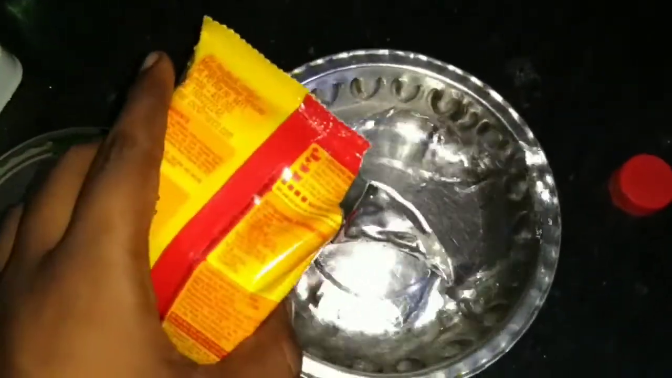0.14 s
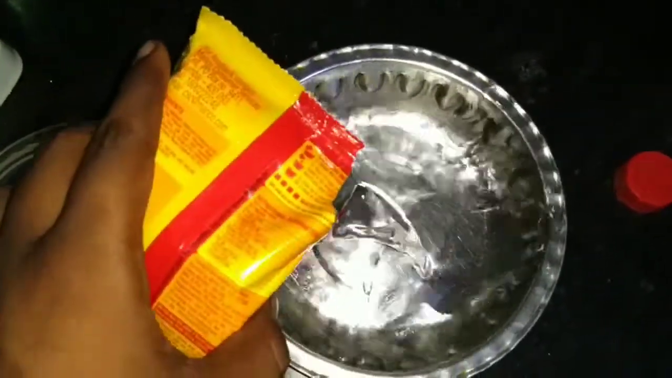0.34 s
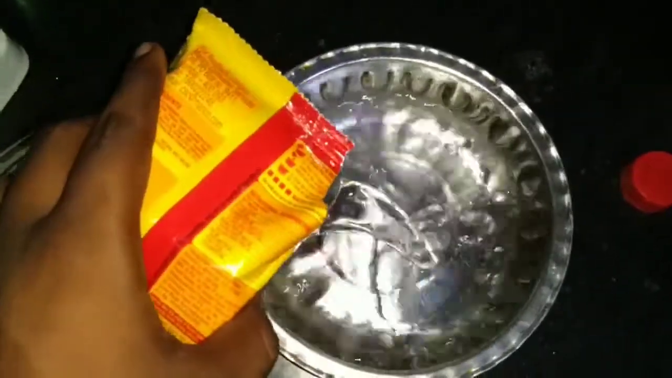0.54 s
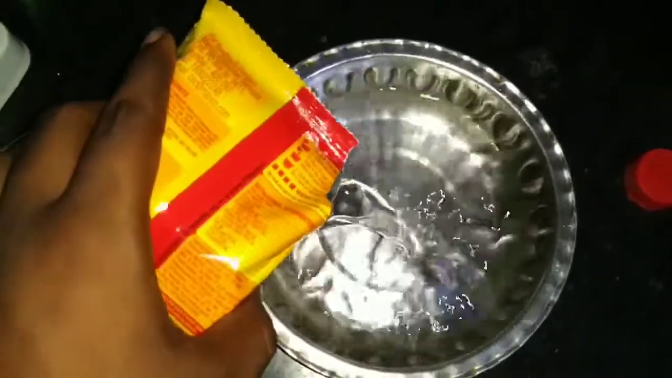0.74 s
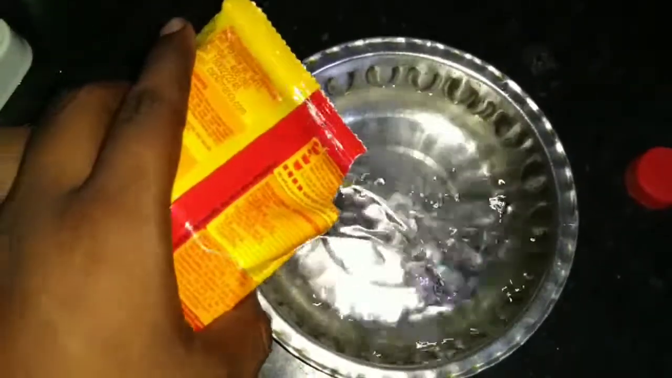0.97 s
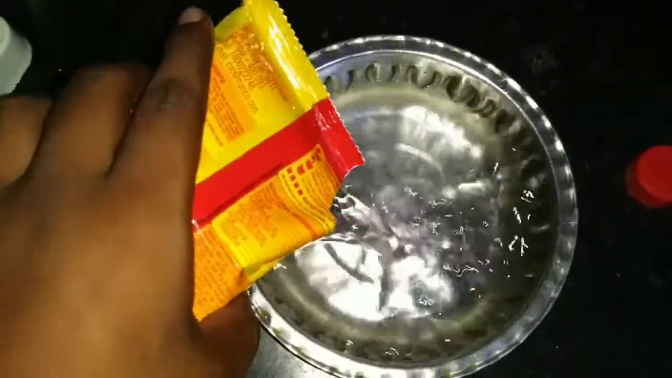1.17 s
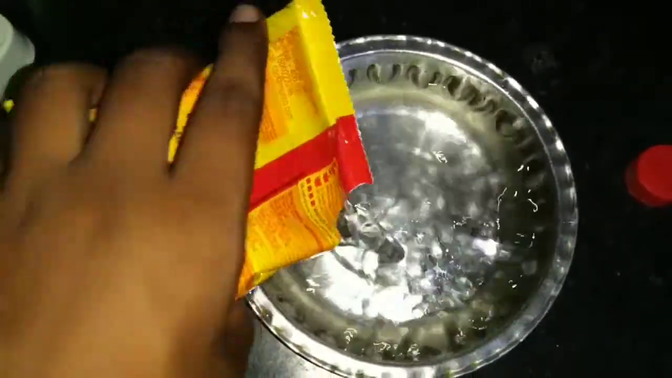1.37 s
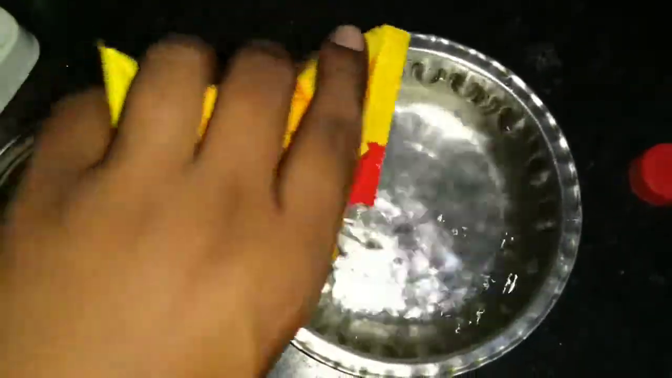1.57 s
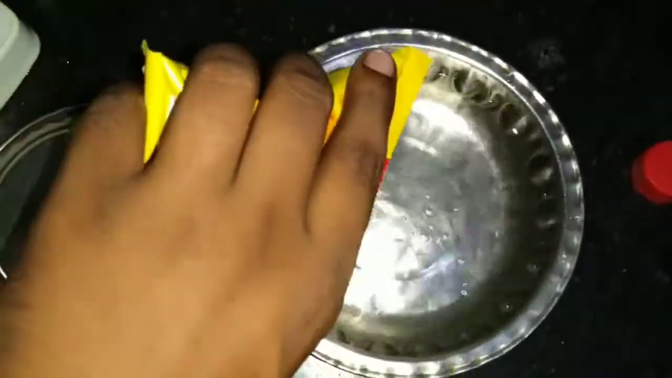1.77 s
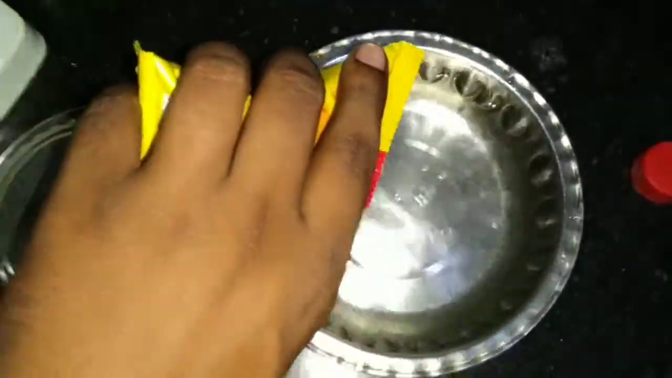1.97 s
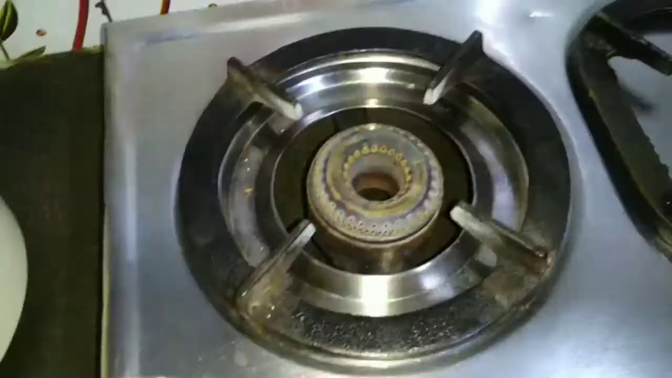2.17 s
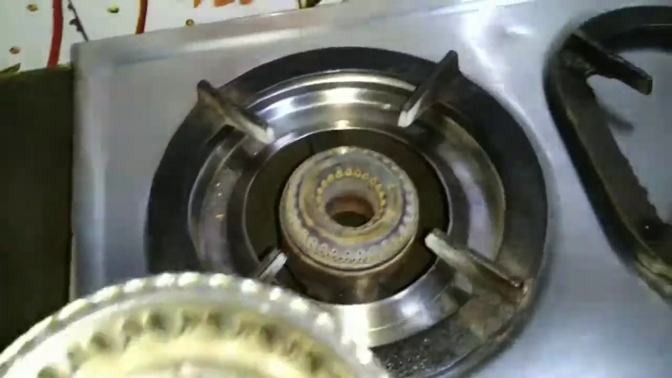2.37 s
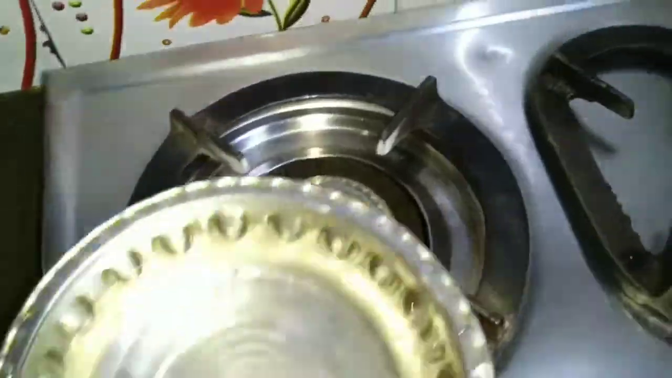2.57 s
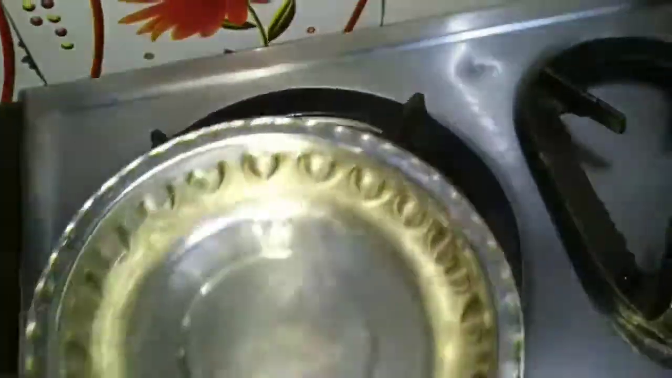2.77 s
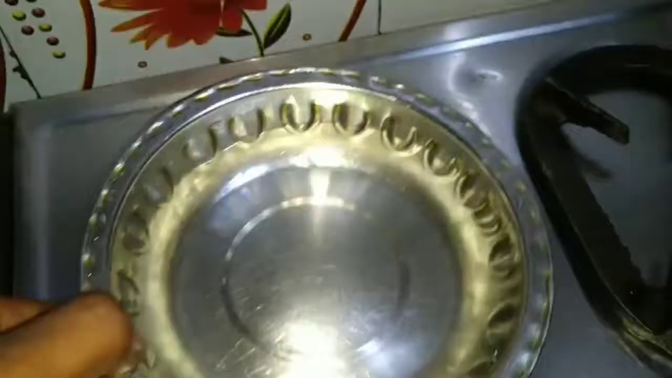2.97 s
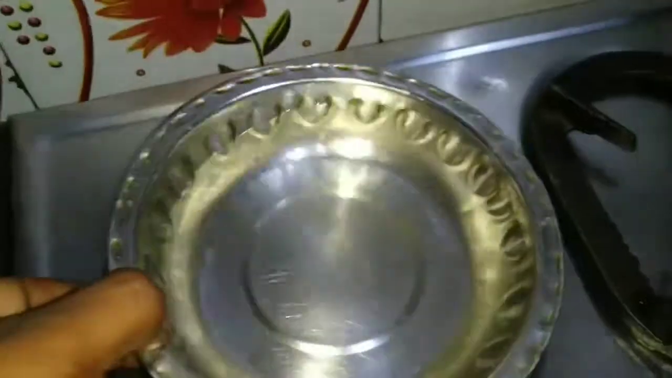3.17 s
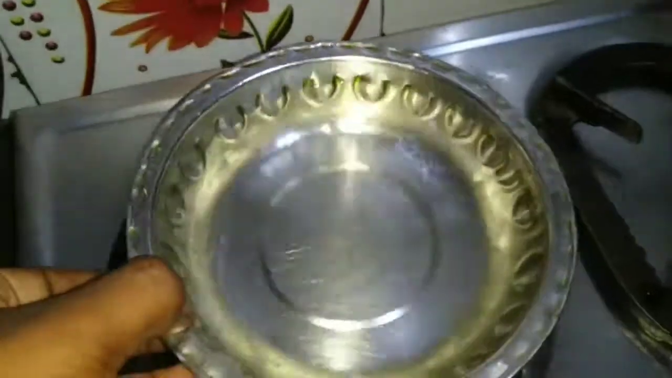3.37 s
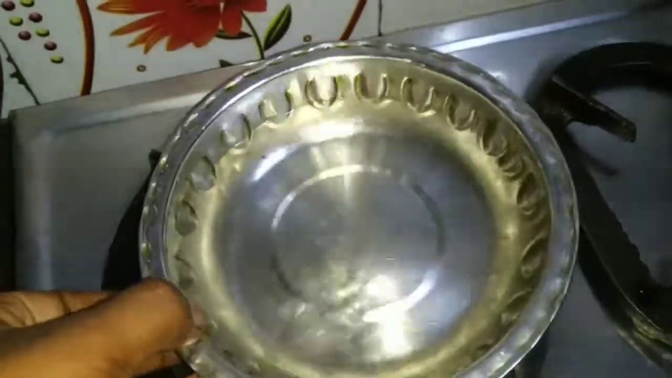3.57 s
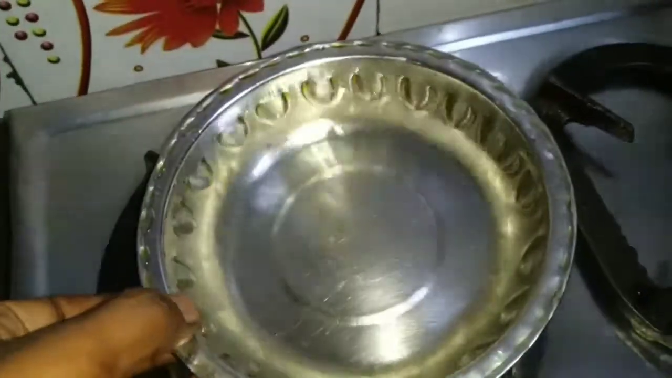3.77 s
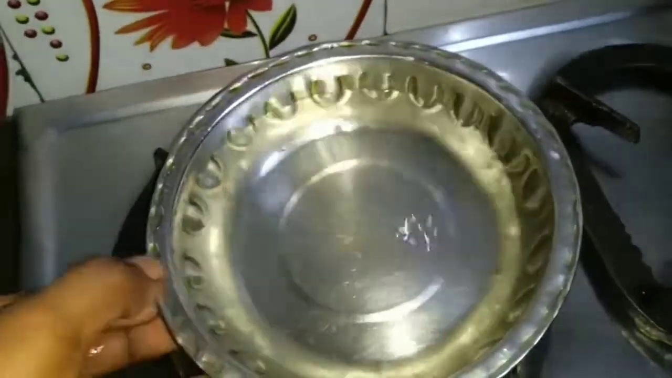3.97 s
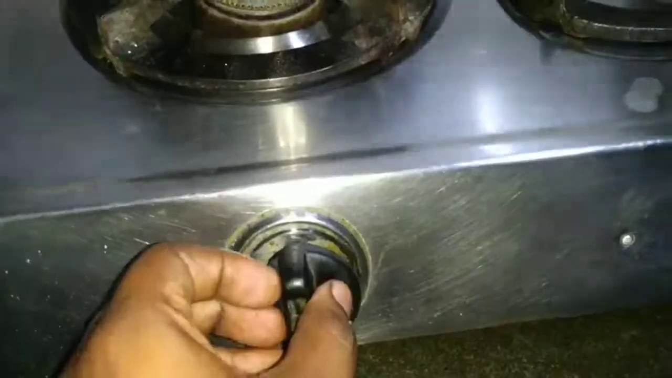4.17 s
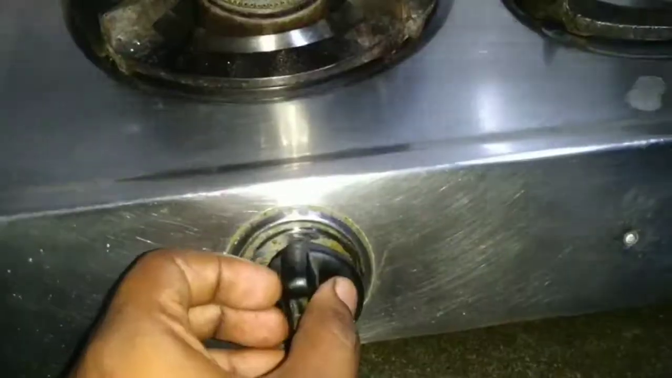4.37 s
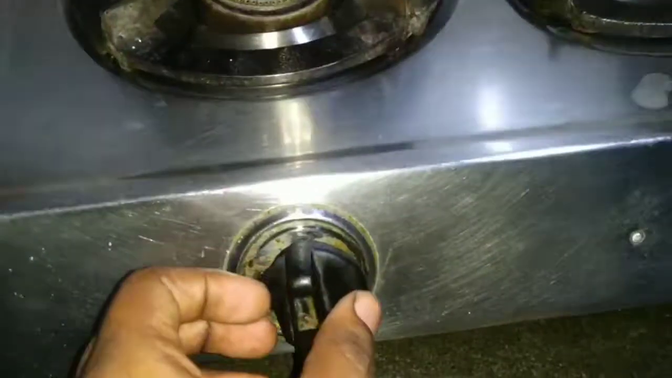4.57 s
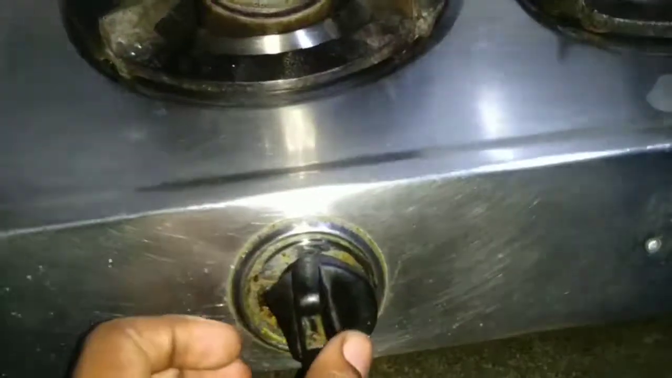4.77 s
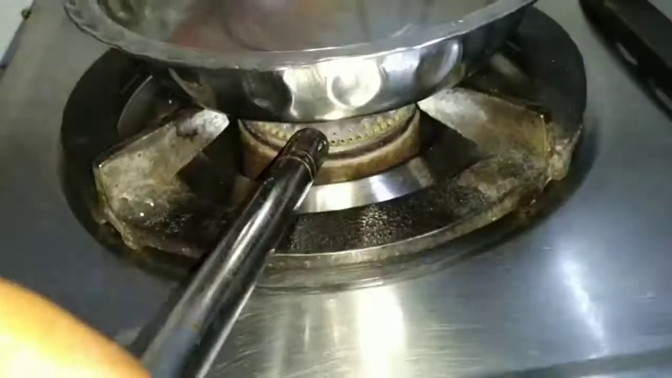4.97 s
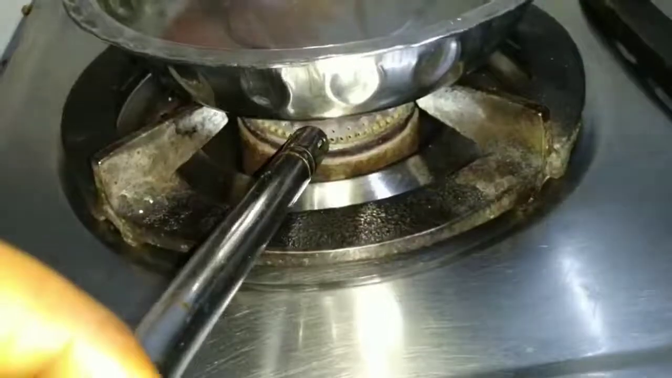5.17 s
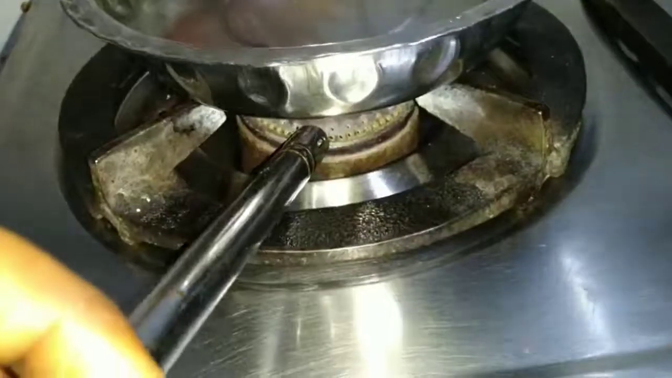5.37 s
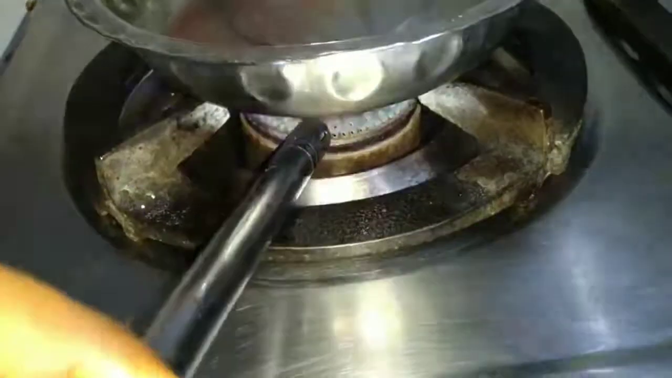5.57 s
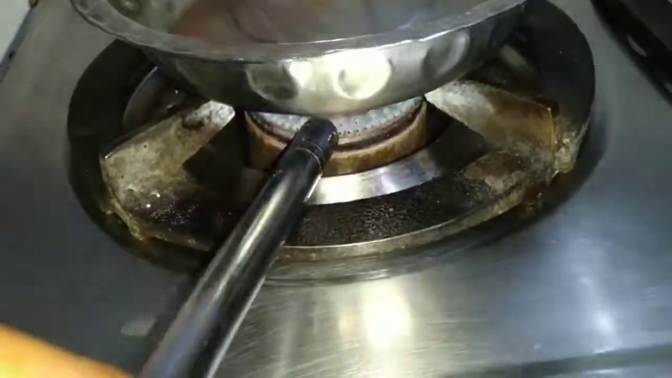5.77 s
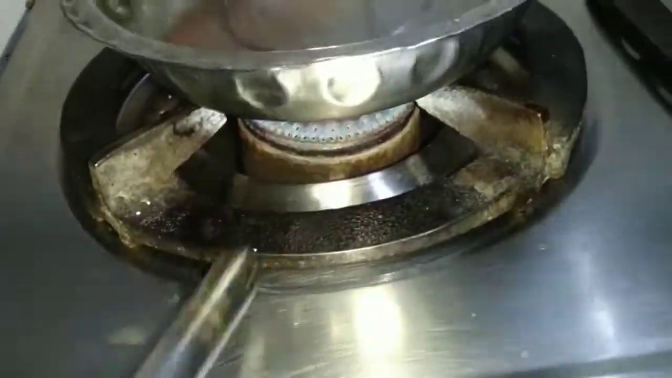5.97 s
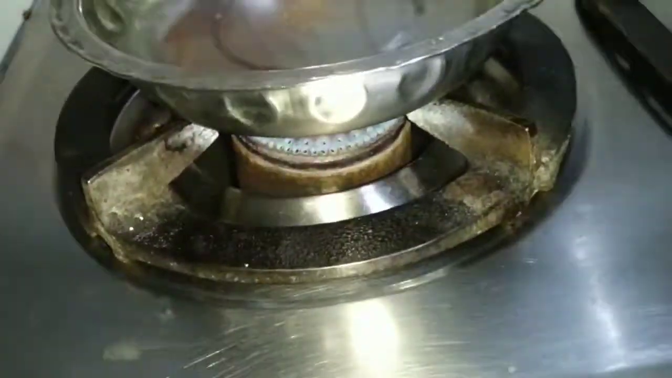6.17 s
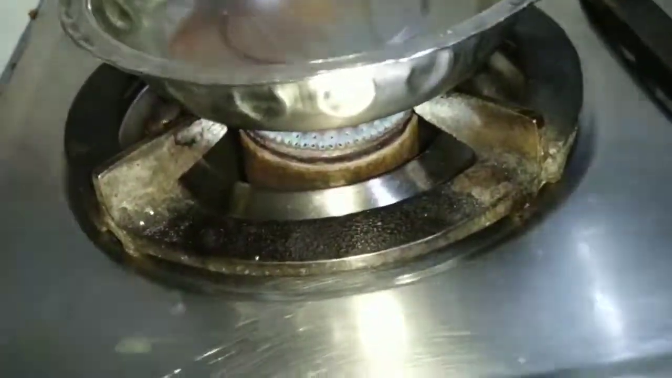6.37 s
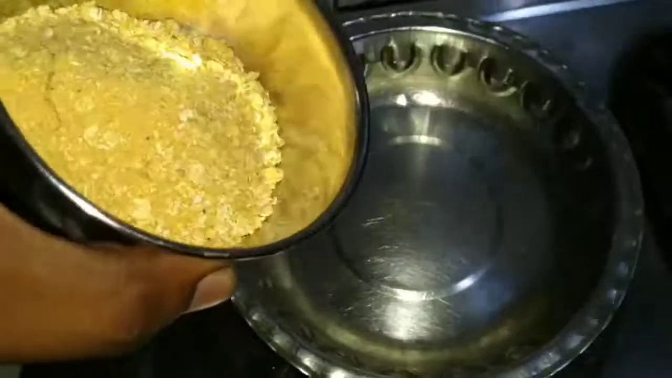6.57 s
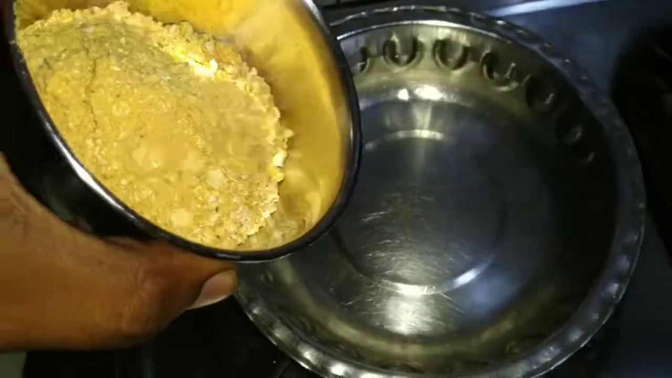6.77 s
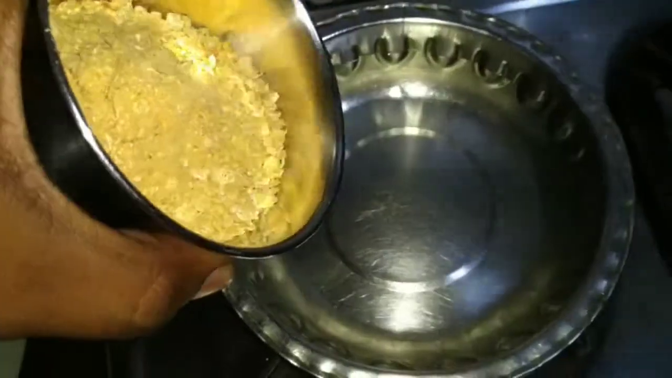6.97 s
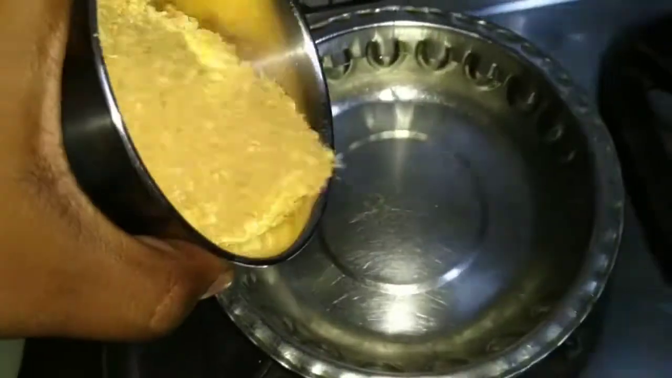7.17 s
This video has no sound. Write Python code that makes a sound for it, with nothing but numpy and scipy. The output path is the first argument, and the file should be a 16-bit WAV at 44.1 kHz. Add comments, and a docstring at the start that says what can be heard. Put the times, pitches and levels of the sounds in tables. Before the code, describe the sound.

A thin watery trickle with bubbles, loud metal bowl clanks and a scrape, then mic bumps, a sharp spark snap, low gas ignition and knocks.

```python
"""Steel bowl on a gas stove

Water trickles from a packet into a steel bowl: splash noise and rising bubble tones. The bowl clanks three
times onto the grate, a dense clatter over decaying modes. Knob ticks, a spark crack, a low whoomp of gas
and knocks of the lighter on the burner follow. Soft low swings are bumps at the hand-held microphone,
and rumble, hum and hiss lie behind; two brief silences part the three stages."""
import sys
import numpy as np
from scipy import signal
from scipy.fft import rfft, irfft, next_fast_len
from scipy.io import wavfile
from scipy.ndimage import map_coordinates

SR = 44100
rng = np.random.default_rng(int(sys.argv[2]) if len(sys.argv) > 2 else 0)


def transcribe(signal):
    """Save signal, clipped to [-1, 1], as a 16-bit WAV file at the path in sys.argv[1]."""
    frames = np.atleast_2d(signal).T
    limited = np.clip(frames, -1, 1)
    pcm = np.round(limited * 32767).astype(np.int16)
    wavfile.write(sys.argv[1], SR, pcm)


N = 318931
T = np.arange(SR) / SR  # one second of a sound's life, in s
CLOCK = np.arange(N) / SR  # scene time in s

# the three stages, with silence between: (start t/s, end t/s)
POURING, PLACING, LIGHTING = (0, 2.085), (2.28, 4.036), (4.2, 7.3)
SPARK_S = 5.409  # the lighter fires

# likeness of the left and right channels: f/Hz, correlation
ALIKE = [(60, 0.62), (150, 0.97), (380, 0.88), (950, 0.21), (2400, 0), (15000, 0.078)]
# spectrum of metal rubbed or drawn over the prongs: f/Hz, relative level per Hz/dB
PRONGS = [(300, -26), (1000, 2.5), (1500, 9.5), (2300, -15), (3000, -13), (3650, -0.5), (3900, -5.5),
          (4300, -6.5), (4750, -10), (5250, -5.5), (6200, -12.5), (8000, -21), (11000, -14), (15000, -25)]
# spectrum of the bowl's contact in the second clank, grazes and base rub: f/Hz, relative level per Hz/dB
DROP_COLOUR = [(60, -30), (120, -24.5), (236, -9), (310, -13.5), (400, -2.5), (700, -0.5), (1200, -6.5),
               (1700, -9), (3300, -13.5), (5200, -19), (7900, -31), (11000, -24.5), (15000, -34.5)]


def amp(db):
    """Level in decibels to amplitude ratio."""
    return 10 ** (np.asarray(db) / 20)


def unit(x):
    """Normalization to an rms of 1."""
    return x / np.sqrt(np.mean(x ** 2) + 1e-20)


def along(points, hz):
    """Linear interpolation of (f/Hz, value) points on a logarithmic frequency axis."""
    f, v = np.transpose(points)
    return np.interp(np.log(hz + 1), np.log(f), v)


def fade(t60, hold=0):
    """Exponential decay, 60 dB in t60 seconds, after a hold at full strength."""
    return np.exp(-np.log(1000) * np.maximum(T - hold, 0) / t60)


def rise(attack):
    """Exponential approach to full strength: a soft onset with time constant attack."""
    return 1 - np.exp(-T / attack)


def pan(db):
    """Left and right gains for an interchannel level difference, positive to the left."""
    return amp([[db / 2], [-db / 2]])


def add(out, s, sound):
    """Superposition of a sound of up to one second, starting at time s."""
    i = max(round(s * SR), 0)
    out[:, i:i + SR] += sound[..., :N - i]


def wobble(rate):
    """A smooth random curve, interpolated through rate random knots a second."""
    return map_coordinates(rng.standard_normal(1000), [CLOCK * rate], mode="wrap")


def strokes(rows, attack_s, t60):
    """Gain envelope of (start, length, dB) movements: linear rise, hold, exponential decay after the length."""
    gain = 0
    for s, length, db in rows:
        decay_db = 60 * np.maximum(CLOCK - s - length, 0) / t60
        gain = gain + amp(db - decay_db) * np.clip((CLOCK - s) / attack_s, 0, 1)
    return gain


def during(stretch, fade_s=0):
    """Gate: 1 inside a stretch and 0 outside, with an optional quadratic fade-in."""
    start, end = stretch
    return np.clip((CLOCK - start) / max(fade_s, 1 / SR), 0, 1) ** 2 * (CLOCK < end)


def noise(colour, size=SR):
    """Spectrally shaped stereo noise of rms 1: coherent in the bass, nearly incoherent in the treble."""
    hz = np.fft.rfftfreq(size, 1 / SR)
    turn = np.arccos(np.clip(along(ALIKE, hz), -1, 1)) / 2
    # mid and side shares of cos and sin give a channel correlation of cos(2 turn)
    spectra = rfft(rng.standard_normal((2, size))) * amp(along(colour, hz))
    mid, side = irfft(spectra * [np.cos(turn), np.sin(turn)], size)
    return unit(np.array([mid + side, mid - side]))


def ring(modes, hold=0, scatter_db=2):
    """Modal superposition: decaying sines at scattered strengths, the high ones out of phase between channels."""
    out = np.zeros((2, SR))
    for hz, db, t60 in modes:
        apart = np.arccos(np.clip(along(ALIKE, hz), -1, 1)) / 2 * rng.choice([-1, 1])
        phase = rng.uniform(0, 2 * np.pi) + np.array([[apart], [-apart]])
        strength = amp(db + scatter_db * rng.normal())
        out += strength * fade(t60, hold) * np.sin(2 * np.pi * hz * T + phase)
    return out


def sheet(x, rugged_db, spacing_hz):
    """High modal density of thin steel: narrow spectral peaks and dips, different in each channel."""
    hz = np.fft.rfftfreq(SR, 1 / SR)
    peaks = [map_coordinates(rng.standard_normal(2000), [hz / spacing_hz], mode="wrap") for port in range(2)]
    depth = rugged_db * np.clip(hz / 2000, 0, 1)  # the bass stays smooth
    return unit(irfft(rfft(x) * amp(depth * np.array(peaks)), SR))


def clatter(colour, chatter, length, loss_db, rugged_db, spacing_hz):
    """Frequency-dependent damping: crowded modes hold while the sheet chatters, then the high ones die first."""
    # time over which the level falls by loss_db, before the length factor: f/Hz, t/s
    ring_length = [(150, 0.93), (400, 0.66), (1000, 0.63), (3000, 0.54), (7000, 0.4), (15000, 0.36)]
    hz, t, z = signal.stft(sheet(noise(colour), rugged_db, spacing_hz), SR, nperseg=256)
    age = np.maximum(t - chatter, 0) / (length * along(ring_length, hz)[:, None])
    return signal.istft(z * amp(-loss_db * age), SR, nperseg=256)[1][:, :SR]


def thump(hz, t60, left_db):
    """A damped low-frequency oscillation whose pitch sags to hz just after the onset."""
    cycles = hz * (T + 0.0055 * rise(0.0028))
    return -np.sin(2 * np.pi * cycles) * rise(0.007) * fade(t60) * pan(left_db) / pan(left_db).mean()


def wash(x, t60, wet_db):
    """Reverberation: x plus its convolution with an exponentially decaying noise tail."""
    tail = rng.standard_normal((2, SR)) * fade(t60) * rise(0.0009)
    return x + amp(wet_db) * signal.fftconvolve(x, tail / np.linalg.norm(tail[0]), axes=1)[:, :N]


def background():
    """Stationary broadband noise: kitchen rumble and hiss, with Lorentzian bands of hum and hiss on top."""
    # background spectra at the pouring and placing, and at the burner: f/Hz, relative level per Hz/dB
    pour_colour = [(18, -52), (30, -30), (51, -9), (97, -1), (160, -14), (202, 0.5), (243, -11), (639, -19),
                   (1200, -25), (1290, -25.5), (1870, -26.5), (2020, -24), (6720, -37), (8720, -36.5),
                   (15500, -38)]
    burner_colour = [(18, -29), (30, -2.5), (75, 2), (173, -14), (243, -20.5), (284, -13.5), (575, -26),
                     (808, -24), (1640, -30.5), (2490, -33.5), (2830, -31.5), (5040, -36.5), (5590, -40),
                     (14300, -41), (15500, -43.5)]
    # narrow bands: f/Hz, half-power width of the amplitude squared left unscaled/Hz, level pouring/dB, burner/dB
    # (the width sets where the amplitude halves)
    whine = [(205, 11, -67, -88), (260, 21, -85, -67.5), (2405, 180, -76.5, -77), (4920, 400, -77.5, -77.5),
             (8770, 510, -74.5, -90), (11000, 120, -87, -88)]
    pour, grate = during(POURING), during(PLACING, fade_s=0.28)
    burner = during(LIGHTING, fade_s=0.16) * amp(2.1 * (CLOCK > SPARK_S))  # the lit burner lifts it by 2.1 dB
    out = (amp(-59) * pour + amp(-58) * grate) * noise(pour_colour, size=N)
    out += amp(-56.5) * burner * noise(burner_colour, size=N)
    f = np.fft.rfftfreq(N, 1 / SR)
    for hz, width, pour_db, burner_db in whine:
        resonance = 1 / (1 + (2 * (f - hz) / width) ** 2)
        band = unit(irfft(rfft(rng.standard_normal((2, N))) * resonance, N))
        level = amp(pour_db) * (pour + .5 * grate) + amp(burner_db) * burner
        side = pan(along([(300, 0), (2000, 5.5)], hz))  # the hiss leans to the left
        out += band * level * side
    return out


def handling():
    """Contact excitation: casing taps and bumps are damped swings, knob ticks and rustles are noise."""
    # fingers tap the microphone's casing, close to the left port: t/s, level/dB, f/Hz, t60/s
    taps = [(4.506, -11.5, 66, 0.077), (4.574, -20, 83.4, 0.069), (4.715, -21.5, 71.4, .074),
            (4.779, -11, 85, 0.063), (5.306, -15.5, 83, 0.045), (5.973, -22, 83.8, 0.052),
            (6.332, -27, 70, 0.094), (6.557, -21, 92, 0.05), (6.786, -38.5, 96, 0.13)]
    # dull bumps of things handled further off: t/s, level/dB, f/Hz
    bumps = [(0.003, -36, 112.6), (3.132, -42, 149), (6.173, -31, 94.3), (6.202, -28, 117.5),
             (6.45, -32.5, 108.4), (6.468, -29.5, 125), (7.156, -27.5, 137), (7.186, -29, 72)]
    # dry ticks of knob and fingers: t/s, level/dB, t60/s
    ticks = [(4.505, -44, .016), (4.608, -50.5, 0.16), (4.681, -46.5, 0.068), (4.718, -32, 0.012),
             (4.783, -38, 0.058), (5.306, -43, .016), (5.654, -46.5, 0.071), (6.204, -42, 0.102),
             (6.331, -23.5, 0.011), (6.45, -48.5, .04), (6.472, -41.5, 0.047)]
    # spectrum of the ticks: f/Hz, relative level per Hz/dB
    tick_colour = [(80, 11.5), (350, 9), (800, -1), (2000, -11.5), (4500, -18.5), (7500, -40), (15000, -51)]
    # soft rustles of handling and the rush of unlit gas: start t/s, length/s, relative level/dB
    rustles = [(4.6, 0.19, -54), (4.87, 0.54, -61), (5.55, 0.8, -57.5), (7.03, 0.17, -62.5),
               (7.15, 0.062, -53)]
    # spectrum of the rustles: f/Hz, relative level per Hz/dB
    rustle_colour = [(100, -0.5), (400, 0), (800, 1), (1200, -12), (2200, -16), (4500, -22), (8000, -37),
                     (15000, -38.5)]
    grain = amp(1.4 * wobble(60) - 2.5)
    out = strokes(rustles, attack_s=0.025, t60=.12) * grain * noise(rustle_colour, size=N)
    for s, db, hz, t60 in taps:
        add(out, s, amp(db) * thump(hz, t60, left_db=42))
    for s, db, hz in bumps:
        add(out, s, amp(db) * thump(hz, t60=.15, left_db=1))
    for s, db, t60 in ticks:
        add(out, s, amp(db) * fade(t60) * rise(0.0002) ** 2 * noise(tick_colour) * pan(13.4))
    return out


def rubbing():
    """Friction: metal rubbed by the hand hisses as shaped noise and now and then sings on a wavering sine."""
    # the tilted dish rubs in the hand: start t/s, length/s, level/dB
    rubs = [(6.45, 0.21, -66.5), (6.92, .31, -67)]
    # faint squeaks of handled metal: middle t/s, peak level/dB, f/Hz, half-length to 1/e/s
    squeaks = [(4.9, -66, 843, .08), (5.122, -70.5, 1560, .05), (5.327, -72.5, 2110, .06)]
    out = strokes(rubs, attack_s=0.14, t60=1) * noise(PRONGS, size=N)
    for s, db, hz, length in squeaks:
        swell = np.exp(-((CLOCK - s) / length) ** 2)
        out += amp(db) * swell * np.sin(2 * np.pi * hz * CLOCK + wobble(50))
    return out


def water():
    """Bubble resonance: a stream splashes as noise, bubbles ring as short rising sines; the packet crinkles."""
    # runs of water from the packet: start t/s, length/s, relative level/dB
    trickles = [(0, 0.11, -73), (.85, .45, -67.5), (1.5, 0.23, -72)]
    # spectrum of stream and drops: f/Hz, relative level per Hz/dB
    splash = [(200, -3), (500, 2), (1000, -2), (1600, -10.5), (2500, -14.5), (5000, -22), (8000, -28.5)]
    # the clearest bubbles: t/s, relative level/dB, starting f/Hz
    bubbles = [(0.071, -41.5, 2760), (0.092, -42.5, 3960), (0.662, -50, 10000), (0.725, -51, 11000),
               (0.821, -48, 2500), (0.83, -52, 4700), (0.931, -49, 1030), (1.195, -48, 2050),
               (1.24, -53, 3220), (1.46, -52, 3130), (1.525, -50, 6300), (1.576, -46, 2780),
               (1.613, -39.5, 2430), (1.834, -47.5, 2000)]
    # a hollow note as the pour begins: f/Hz, relative level/dB, t60/s
    glug = [(275, -45, 0.15), (374, -47, 0.11), (444, -47, 0.13), (540, -52, 0.13)]
    # crinkles of the packet: t/s, relative level/dB, t60/s
    crinkles = [(0.566, -54, 0.061), (0.66, -65.5, 0.16), (0.73, -62.5, 0.23), (0.868, -56.5, .06),
                (1.597, -59, 0.31)]
    # spectrum of the crinkles: f/Hz, relative level per Hz/dB
    foil = [(300, -12), (900, -17), (3000, -0.5), (7500, -10.5), (11500, -4.5), (15500, -22)]
    # fat drops slap the water: t/s, relative level/dB, t60/s
    drops = [(0.09, -63, 0.061), (0.562, -63, 0.045), (0.925, -59.5, 0.32), (1.355, -57, 0.1),
             (1.526, -48, 0.027), (1.611, -44, 0.018)]
    flutter = amp(5.1 * wobble(22.3))
    out = strokes(trickles, attack_s=0.14, t60=.7) * flutter * noise(splash, size=N)
    # small bubbles come at random while the stream runs strongest
    small = []
    for when, strength, pitch in rng.random(size=(18, 3)):
        small.append((.8 + .72 * when, -58 + (2 * strength - 1), 1400 * 2 ** (1.5 * pitch)))
    plinks = np.zeros((2, N))
    for s, db, hz in list(bubbles) + small:
        life = 35 / hz  # t60 in s: high bubbles die sooner
        tone = np.sin(2 * np.pi * hz * T * (1 + 0.061 * T / life))
        add(plinks, s, amp(db) * np.sqrt(hz / 2000) * fade(life) * tone)
    add(out, 0, ring(glug) * rise(0.0012))
    for hits, colour in (crinkles, foil), (drops, splash):
        for s, db, t60 in hits:
            add(out, s, amp(db) * fade(t60) * rise(0.00041) * noise(colour))
    # the bowl smears both parts
    out = wash(out, t60=0.24, wet_db=-2.5) + amp(-7.0) * wash(plinks, t60=0.16, wet_db=9)
    return out * pan(1.0) * during(POURING)


def lighter():
    """Impulsive excitation: the snap is a sharp noise crack with a ringing tail; knocks sound burner modes."""
    # spectrum of the crack: f/Hz, relative level per Hz/dB
    spark = [(100, -20.5), (700, -19.5), (1600, -2), (2400, -10.5), (4000, 0.5), (5000, -7), (6400, 1.5),
             (8200, -21), (9500, -4.5), (13000, -15.5), (15500, -13.5)]
    # the lighter's body and the hob answer the snap: f/Hz, relative level per Hz/dB
    spark_tail = [(100, 1), (350, 9), (600, -3), (850, 2), (1100, -7.5), (1600, -3.5), (2800, -5.5),
                  (3600, -4.5), (4200, 1), (5200, -8), (7200, -10), (8300, -18), (9500, -6), (12000, -17),
                  (15000, -19)]
    # the lighter against the burner: t/s, relative level/dB, t60/s
    knocks = [(5.506, -40, 0.27), (5.653, -43.5, 0.17), (5.849, -30.5, 0.36), (5.932, -31.5, 0.31)]
    # spectrum of the knocks' noise: f/Hz, relative level per Hz/dB
    knock_colour = [(80, -10), (260, -8.5), (380, -6.5), (650, 2.5), (830, 2), (1050, -14.5), (1300, -12),
                    (2200, -23.5), (3600, -22.5), (5300, -33), (8000, -52), (14000, -49.5)]
    # modes of the burner: f/Hz, relative level/dB, t60/s
    burner_modes = [(262.3, -14, 0.36), (490, -7.5, 0.32), (638, -1.5, 0.23), (790, -1.5, 0.26),
                    (1250, -10.5, 0.17)]
    out = np.zeros((2, N))
    crack = amp(-10) * fade(0.008, hold=.001) * noise(spark)
    tail_decay = amp(-31.5) * fade(0.11, hold=0.017) + amp(-33) * fade(0.31)
    tail = tail_decay * sheet(noise(spark_tail), rugged_db=3.5, spacing_hz=45.3)
    add(out, SPARK_S, (crack + tail) * rise(0.00029))
    for s, db, t60 in knocks:
        decay = fade(t60) * (0.91 + 0.3 * fade(0.088, hold=0.013))
        knock = amp(-0.5) * decay * noise(knock_colour) + amp(-1) * ring(burner_modes)
        add(out, s, amp(db) * rise(0.0021) * knock)
    return out


def ignition():
    """Cavity oscillation: the flaring gas swings as low damped sines under the bowl, with a noise whoomp."""
    # gas catching under the bowl: f/Hz, relative level/dB, t60/s
    flame = [(69.1, -19.5, 0.96), (142.8, -17, 0.58), (106.1, -29, 0.51), (281, -39.5, 0.23)]
    # spectrum of the whoomp's noise: f/Hz, relative level per Hz/dB
    whoomp = [(30, -4.5), (70, 2), (150, -0.5), (250, -12.5), (400, -18.5), (550, -29), (850, -20),
              (1200, -44.5), (3000, -60.5)]
    out = np.zeros((2, N))
    swell = 1 / (1 + np.exp(-(T - .026) / 0.0036))
    swing = sum(amp(db) * fade(t60, hold=0.017) * np.sin(2 * np.pi * hz * T) for hz, db, t60 in flame)
    flare = swing * (.4 + .8 * fade(.1, hold=.066))
    roar = amp(-24.5) * fade(0.61, hold=0.034) * noise(whoomp)
    add(out, SPARK_S, swell * (flare + roar))
    return out


def shifting():
    """Friction-driven modes: the held bowl hums, grazes the grate and scrapes over the prongs between blows."""
    # the lifted bowl hums on one rim mode, swelling as it turns: start t/s, length/s, relative level/dB
    hums = [(2.52, 0.16, -56.5), (2.69, 0.072, -50.5), (2.79, 0.042, -54.5), (2.85, .1, -63),
            (2.96, .105, -55.5)]
    # the bowl grazes the grate lightly: t/s, level/dB
    grazes = [(2.914, -54.5), (3.131, -50.5), (3.968, -55)]
    # the bowl is pushed over the prongs: start t/s, length/s, relative level/dB
    scrapes = [(3.28, .15, -51)]
    # upper modes woken by scraping: f/Hz, relative level/dB
    shimmer_modes = [(3020, -3.5), (3640, -1), (4300, -1.5), (4520, -5.5), (5230, -2.5)]
    hum = np.sin(2 * np.pi * 970 * CLOCK + np.array([[0], [.8]]))
    out = strokes(hums, attack_s=0.035, t60=.15) * amp(1.5 * wobble(24.9)) * hum
    for s, db in grazes:
        add(out, s, amp(db) * fade(.07) * rise(.001) * noise(DROP_COLOUR))
    shimmer = np.zeros((2, N))
    for port in range(2):
        for hz, db in shimmer_modes:
            # friction keeps knocking each mode out of phase
            tone = np.sin(2 * np.pi * hz * CLOCK + 1.7 * wobble(70))
            shimmer[port] += amp(db + 3 * wobble(14)) * tone
    grit = amp(-5.5 + 1.5 * wobble(90)) * noise(PRONGS, size=N)
    out += strokes(scrapes, attack_s=.1, t60=0.33) * (amp(-3.5) * unit(shimmer) + grit)
    # the base rubs along
    out += amp(3) * strokes(scrapes, attack_s=.03, t60=.5) * noise(DROP_COLOUR, size=N)
    return out * during(PLACING)


def bowl():
    """Impact and modal decay: steel chatters on the grate, the clatter dies, modes of bowl and stove ring on."""
    # blows: t/s, clatter level/dB, chatter t/s, first blow share, ring length factor,
    # bowl ring relative level/dB, stove ring relative level/dB
    clanks = [(2.4089, -29.5, 0.082, 0.28, 1, -34.5, -61), (3.171, -20, 0.031, 0.079, 0.69, -57, -23.5),
              (3.5955, -23, .012, 0.45, 0.57, -54, -30)]
    # spectra of the first and third contact points: f/Hz, relative level per Hz/dB
    rim_colour = [(60, -30.5), (120, -20.5), (236, -7.5), (285, -11.5), (500, -4), (740, 2), (930, -9),
                  (1400, -9.5), (2900, -17.5), (5200, -23), (7900, -37), (10300, -29.5), (15000, -40.5)]
    settle_colour = [(60, -26.5), (110, -28), (160, -8), (385, -2.5), (500, -11), (590, 3), (850, -2),
                     (1150, -14), (1600, -15), (3700, -20), (5200, -24), (7900, -39), (12000, -33),
                     (15000, -40)]
    # modes of the bowl: f/Hz, relative level/dB, t60/s
    bowl_modes = [(231, -8, 0.46), (458, -4.5, .52), (498, -12.5, .33), (674, -5.5, .42),
                  (722.4, -3.5, 0.44), (967, -11, .66), (1245, -9.5, .45), (1830, -14.5, .36),
                  (2090, -8, .85), (2504, -9.5, 0.67), (2579, -12, .58), (3585, -16, .5)]
    # modes of stove top and grate: f/Hz, relative level/dB, t60/s
    stove_modes = [(158, -15.5, .65), (194.5, -11, .34), (246, -8, 0.57), (363, -10, 0.77), (392.7, 0, .42),
                   (450.4, -9, .7), (577, -1.5, 0.21), (650, -4, .24), (783, -6.5, .3), (933, -8, 0.27),
                   (1022, 2.5, 0.19), (1210, -12, .17), (1430, -11, 0.32), (1535, -9, .26),
                   (1640, -13, .21), (1780, -12.5, .35), (2000, -13.5, 0.17), (2800, -12, .17),
                   (2955, -24, .6), (3360, -11, .14), (3670, -17.5, 0.41)]
    out = np.zeros((2, N))
    colours = (rim_colour, DROP_COLOUR, settle_colour)
    for (s, db, chatter, blow, length, bowl_db, stove_db), colour in zip(clanks, colours):
        # most energy leaves quickly through the grate, the rest lingers in the sheet's sharpest peaks
        quick = clatter(colour, chatter, length, loss_db=100, rugged_db=3.5, spacing_hz=70)
        lingering = clatter(colour, chatter, length, loss_db=52, rugged_db=5.5, spacing_hz=24)
        crash = amp(-1.7) * quick + amp(-6.7) * lingering
        crash = crash * rise(.0006) * (1 + blow * fade(.06))
        modes = amp(bowl_db) * ring(bowl_modes, hold=chatter / 2)
        modes += amp(stove_db) * ring(stove_modes, hold=chatter / 2)
        add(out, s, amp(db) * crash + modes * rise(0.0047) * pan(-1.5))
    return out * during(PLACING)


def scene():
    """Linear superposition of all sources at the microphone."""
    return background() + handling() + rubbing() + water() + lighter() + ignition() + shifting() + bowl()


def record(dry):
    """Band limitation: an ideal low-pass removes everything from 15600 Hz up."""
    size = next_fast_len(N + SR // 2)
    passband = np.fft.rfftfreq(size, 1 / SR) < 15600
    return irfft(rfft(dry, size) * passband, size)[:, :N]


dry = scene()
out = record(dry)
transcribe(out)
```